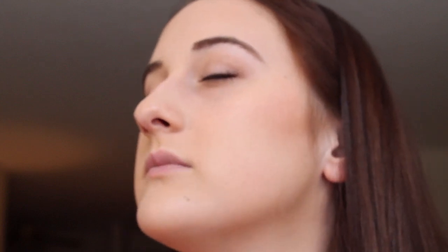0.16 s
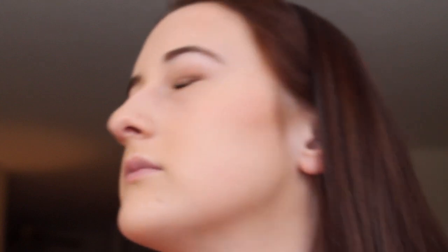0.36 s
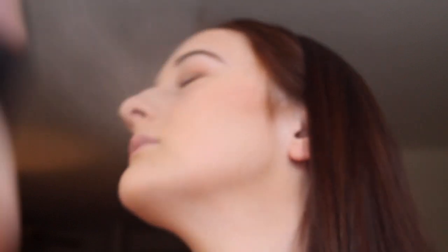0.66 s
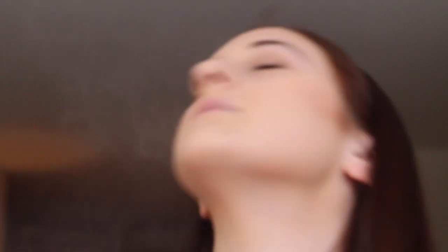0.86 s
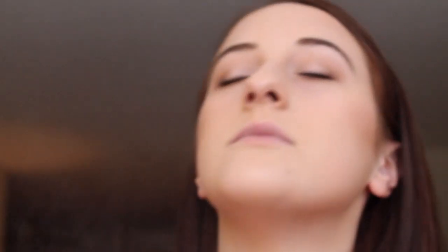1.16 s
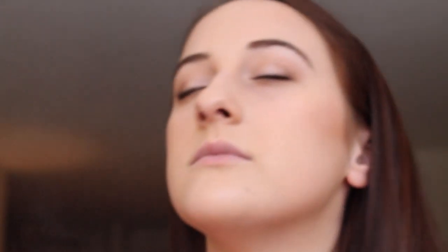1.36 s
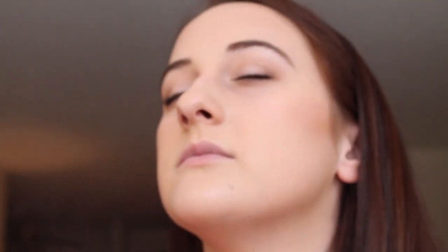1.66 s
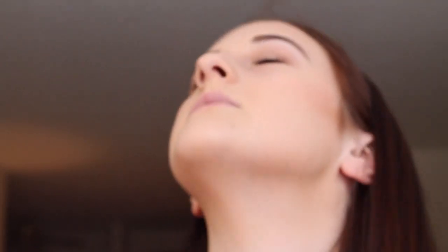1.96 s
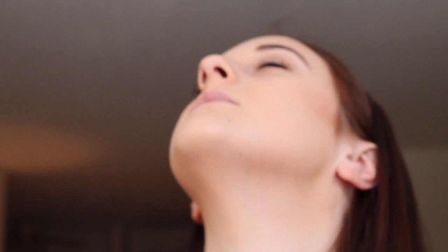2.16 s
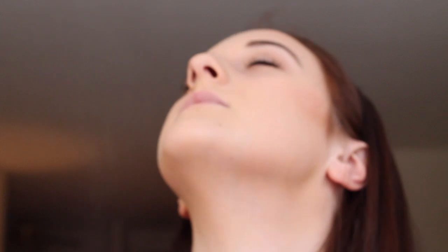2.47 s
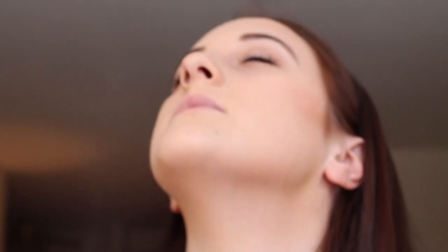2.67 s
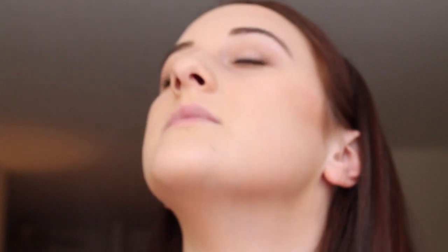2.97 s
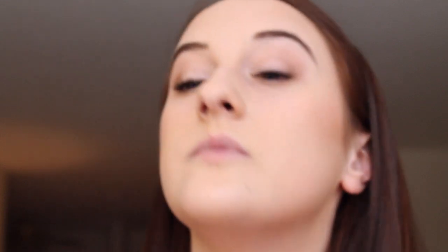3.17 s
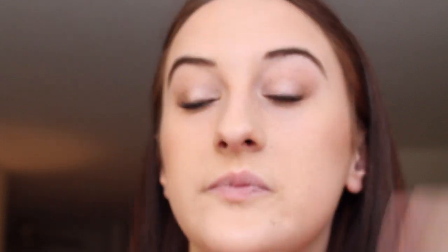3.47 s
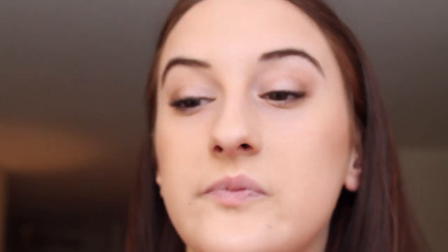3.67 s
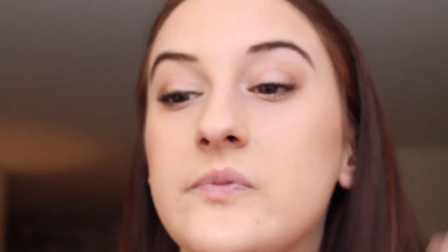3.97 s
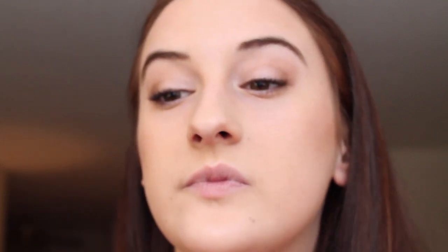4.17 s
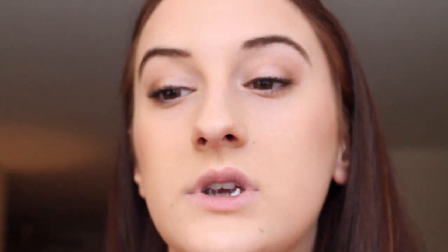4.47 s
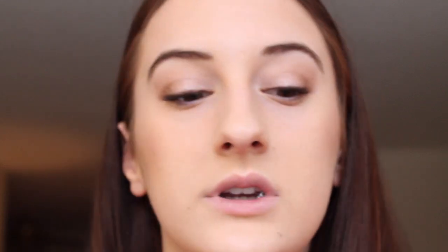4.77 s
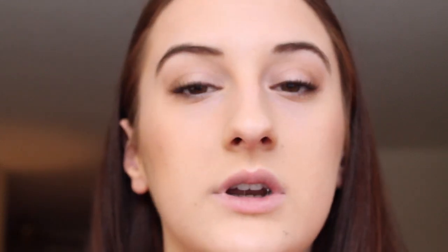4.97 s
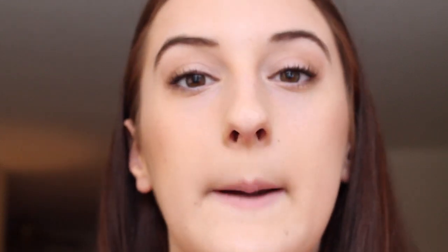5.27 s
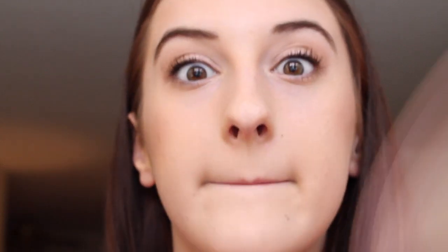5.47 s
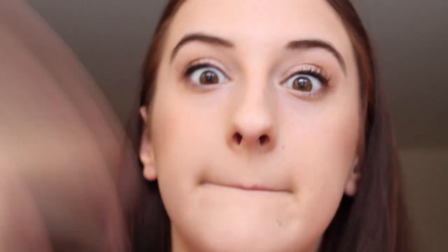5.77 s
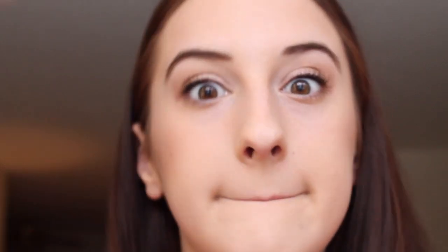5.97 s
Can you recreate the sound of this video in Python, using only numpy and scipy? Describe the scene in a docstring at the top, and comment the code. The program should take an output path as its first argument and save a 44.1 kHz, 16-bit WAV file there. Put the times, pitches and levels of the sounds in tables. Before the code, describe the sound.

In a quiet little room with faint ventilation, one close microphone picks up four fast puffs of mist from a spray bottle and a fifth after a short pause. The pump ticks and gulps after each stroke, and fingers tap the plastic. The cap clicks sharply into place. A lull follows, then soft wet lip smacks, and finally a solid knock as the bottle lands on a table.

```python
"""A small, quiet room with a faint fan hum; one microphone, close to a pump spray bottle.
Five quick spritzes hiss as the jet tears into droplets. Fingers tap the plastic, bubbles glug,
and after each stroke the plunger ticks back up and liquid gulps into the pump.
The cap snaps on, lips part with small wet smacks, and the bottle knocks down on a table."""
import sys
import numpy as np
from scipy import signal
from scipy.fft import rfft, irfft
from scipy.io import wavfile

SR = 44100
rng = np.random.default_rng(int(sys.argv[2]) if len(sys.argv) > 2 else 0)


def log_audio(samples):
    """Write samples as a 16-bit WAV file to the path given in sys.argv[1]."""
    # one column per channel
    frames = np.atleast_2d(samples).T
    # limit to full scale, then quantise
    limited = np.clip(frames, -1, 1)
    pcm = np.round(limited * 32767).astype(np.int16)
    wavfile.write(sys.argv[1], SR, pcm)


N = 269719

# room tone, the spectrum of the ventilation: f/Hz, level/dB
VENT_SPECTRUM = [(15, -56), (25, -29.5), (64, -10), (129, -6.5), (152, -5.5), (313, -5.5), (349, -6),
                 (509, -6), (631, -13), (703, -8.5), (997, -14), (1080, -12.5), (1240, -14.5), (1900, -18),
                 (15500, -34.5)]
# fan tones: f/Hz, level/dB
FAN_TONES = [(212, -74.5), (318, -71.5), (404, -84.5), (1061, -74)]
# fingers and cap tapping the plastic: t/s, level/dB, f/Hz
PLASTIC_TAPS = [(.3337, -29, 2170), (.6072, -43.5, 3500), (0.621, -52, 4800), (.8786, -40, 4700),
                (1.0425, -50, 4320), (1.6572, -52.5, 4400), (2.6755, -55, 3750), (2.7428, -47, 2230),
                (2.8222, -57, 3900), (2.9312, -35, 1830)]
# microphone colour on the ticks, with a dip near 10.5 kHz and a lift near 13.5 kHz: f/Hz, level/dB
MIC_SPECTRUM = [(500, 6), (3000, 2.5), (6000, 3.5), (8200, 0), (10500, -9), (13500, 3), (16000, 2)]
# pump strokes: start t/s, swell/s, end t/s, fade/s, level/dB, tilt/(dB per octave)
STROKES = [(.372, 0.025, 0.55, 0.077, -42.5, 2.5), (.636, 0.021, 0.8, 0.072, -39.5, 3.5),
           (.908, 0.028, 1.08, 0.095, -42.5, 4.5), (1.195, 0.045, 1.3455, .066, -43.5, 3.5),
           (1.795, 0.067, 1.942, 0.0032, -41.5, 2.5)]
# hiss of the mist, close up: f/Hz, level/dB
MIST_SPECTRUM = [(350, -58), (600, -29), (706, -4), (940, -7.5), (1320, -1.5), (1600, -5), (2160, 0),
                 (2340, -1), (3160, 1), (4880, 0), (5290, -2), (7960, -5), (10700, -15.5), (13900, -15),
                 (15500, -22.5)]
# air bubbles in the liquid: t/s, level/dB, f/Hz, t60/s
AIR_BUBBLES = [(.3742, -35.5, 794, 0.038), (.398, -43.5, 816, 0.081), (.416, -33.5, 854, 0.0085),
               (0.6747, -41.5, 840, 0.011), (.6955, -37.5, 1270, 0.015), (1.8461, -40.5, 1000, 0.012),
               (2.353, -48.5, 1465, 0.074), (2.6953, -45.5, 950, 0.056)]
# plunger return: t/s, tick level/dB, f/Hz, treble slope/(dB per octave), gulp lag/s, gulp level/dB
PLUNGER_RETURNS = [(0.5348, -31, 2920, -6.5, 0.024, -37.5), (0.7959, -35.5, 4500, 3, 0.019, -25),
                   (1.0612, -35, 2850, -4, .0187, -31), (1.352, -31.5, 2790, -8, .0213, -30.5),
                   (2.035, -36, 3000, -4, 0.032, -27)]
# contacts as the cap seats: t/s, level/dB
CAP_HITS = [(2.9333, 2.5), (2.9403, -17)]
# colour of the cap's snap: f/Hz, level/dB
SNAP_SPECTRUM = [(240, -65.5), (400, -41), (552, -52), (772, -11.5), (1020, -11), (1540, -14), (1740, -7),
                 (2630, -5), (3010, -3.5), (3790, -2.5), (6580, -5.5), (7910, -10), (10600, -22.5),
                 (15500, -23)]
# modes of the capped bottle: f/Hz, level/dB, t60/s
BOTTLE_MODES = [(1906, -4, .3), (2169, -4, .3), (3090, -3, .1), (3892, 0, .3), (4140, 0, .2), (4665, 0, .3),
                (5006, -3, .25)]
# lip smacks and the mouth's ring: t/s, level/dB, f/Hz
LIP_SMACKS = [(4.3886, -30.5, 6270), (4.3945, -46, 5770), (4.4157, -51, 4060), (4.5581, -38.5, 1700),
              (4.5612, -45.5, 4000), (4.7572, -42.5, 1450), (4.7703, -42, 1564), (4.783, -43.5, 1610)]
# contacts of the bottle's base with the table: t/s, level/dB
BASE_HITS = [(5.1195, 5.5), (5.1286, -6.5), (5.32, -30)]
# colour of the knock: f/Hz, level/dB
KNOCK_SPECTRUM = [(59, -62), (100, -21.5), (198, -23), (376, -2.5), (895, -3.5), (993, -0.5), (1100, -17),
                  (1220, -5.5), (1330, -12.5), (1730, -8.5), (2470, -18), (3290, -27.5), (4680, -28.5),
                  (6120, -41), (14000, -68)]
# modes of the table: f/Hz, level/dB, t60/s
TABLE_MODES = [(398, 1, .33), (573, -6, .28), (619, -5, .3), (727, -1, .19), (797, -11, .3), (990, -6, .25),
               (1147, -4, .25), (1226, -4, .2), (1580, -11, .3), (1770, -5, .12), (2073, -12, .25)]
# decay of the room: f/Hz, t60/s
ROOM_DECAY = [(250, 0.75), (700, 0.34), (2000, 0.42), (4500, 0.46), (8000, 0.34), (15000, 0.11)]
# reflections off near surfaces, timed from the direct sound: t/s, level/dB
REFLECTIONS = [(.0026, -18), (.0046, -15.5), (.0072, -27), (.0098, -13.5), (0.0419, -18)]


def amp(db):
    """Decibels to gain."""
    return 10 ** (np.asarray(db) / 20)


def unit(x):
    """Scales to rms 1."""
    return x / np.sqrt(np.mean(x ** 2) + 1e-20)


def curve_at(points, hz):
    """Joins points by straight lines over log frequency."""
    f, value = np.transpose(points)
    return np.interp(np.log(hz + 1), np.log(f + 1), value)


def seconds(length):
    """A time axis."""
    return np.arange(int(length * SR)) / SR


def add(mix, start, sound):
    """Mixes a sound in at a time in seconds."""
    part = mix[max(round(start * SR), 0):][:len(sound)]
    part += sound[:len(part)]


def colour(x, spectrum, tilt_db=0, size=4096):
    """Minimum-phase filter of unit energy with the given spectrum, tilted per octave."""
    hz = np.fft.rfftfreq(size, 1 / SR)
    log_gain = np.log(amp(curve_at(spectrum, hz) + tilt_db * np.log2(hz + 20)))
    mirrored = np.r_[log_gain, log_gain[-2:0:-1]]
    response = np.fft.ifft(np.exp(np.conj(signal.hilbert(mirrored)))).real
    return signal.fftconvolve(x, response / np.linalg.norm(response))[:len(x)]


def low_cut(x, hz):
    """Small things radiate almost no bass."""
    return signal.sosfilt(signal.butter(3, hz, "highpass", fs=SR, output="sos"), x)


def drift(rate_hz):
    """Random wandering of rms 1, mostly slower than the rate."""
    hz = np.fft.rfftfreq(N, 1 / SR)
    return unit(irfft(rfft(rng.standard_normal(N)) / (1 + (hz / rate_hz) ** 4), N))


def ring(t, hz, t60):
    """One dying mode."""
    return np.sin(2 * np.pi * hz * t) * amp(-60 * t / t60)


def burst(t60, passes=4):
    """A dense dying rattle of unit energy with no colour of its own."""
    t = seconds(.2)
    x = rng.standard_normal(len(t)) * amp(-60 * t / t60)
    for _ in range(passes):
        spectrum = rfft(x)
        whitened = irfft(spectrum / (abs(spectrum) + 1e-12), len(t))
        x = whitened * np.exp(-(t / t60) ** 2)
    return x / np.linalg.norm(x)


def room_tone(vent_db=-60, waver_rad=0.82):
    """Soft ventilation noise with a few wavering fan tones, behind everything."""
    air = unit(colour(rng.standard_normal(N), VENT_SPECTRUM))
    t = np.arange(N) / SR
    hum = sum(amp(db) * unit(np.sin(2 * np.pi * hz * t + waver_rad * drift(2.4))) for hz, db in FAN_TONES)
    return amp(vent_db) * air + hum


def clicks(rows, rattle_db, crack_db):
    """Each click is a broad crack with a brief rattle, round one short ring."""
    out, t = np.zeros(N), seconds(.2)
    for start, db, hz, t60, slope_db in rows:
        shape = [(hz / 6, -32), (hz / 2, -13), (hz, 0), (hz * 2, slope_db - 3),
                 (hz * 16, 4 * slope_db - 3)]
        crack = colour((t == 0) + amp(rattle_db) * burst(t60), shape)
        add(out, start, amp(db) * (ring(t, hz, t60) + amp(crack_db) * crack))
    return out


def glugs(rows, gulp_db=9, slosh_db=-2, slosh_t60=0.047, slosh_lag_s=0.00187):
    """Liquid is jolted in the pump; a pocket of air rings briefly and the liquid sloshes after."""
    out, t = np.zeros(N), seconds(.2)
    for start, db, hz, t60 in rows:
        shape = [(hz * .5, -28), (hz * 0.69, 0), (hz * 1.41, -3), (hz * 2, -22), (hz * 12, -48)]
        flow = 1. * (t == 0)
        add(flow, slosh_lag_s, amp(slosh_db) * burst(slosh_t60))
        add(out, start, amp(db) * (amp(gulp_db) * colour(flow, shape) + ring(t, hz, t60)))
    return low_cut(out, hz=450)


def taps(t60=0.0092, slope_db=-16, hollow_db=-3.5, hollow_hz=880, hollow_t60=0.014):
    """Handling noise: each tap clicks on the plastic and jolts a hollow note from the liquid."""
    ticks = [(start, db, hz, t60, slope_db) for start, db, hz in PLASTIC_TAPS]
    jolts = [(start, db + hollow_db, hollow_hz, hollow_t60) for start, db, _ in PLASTIC_TAPS]
    return colour(clicks(ticks, rattle_db=8.5, crack_db=7.5), MIC_SPECTRUM) + glugs(jolts)


def spray(sputter_db=0.74, sputter_hz=350, opening=0.52, brighten_db=0.5):
    """The jet tears into droplets: a sputtering hiss that swells and fades with the finger's pressure."""
    jet = unit(rng.standard_normal(N) * amp(sputter_db * drift(sputter_hz)))
    out = np.zeros(N)
    for start, swell, end, fade, db, tilt_db in STROKES:
        t = seconds(end - start)
        # the valve opens abruptly once the pressure passes its threshold
        push = opening + (1 - opening) * np.sin(np.pi / 2 * np.clip(t / swell, 0, 1))
        pressure = push * np.clip((t[-1] - t) / fade, 0, 1)
        # the mist brightens a little along the stroke
        hiss = jet[round(start * SR):][:len(t)]
        dull = colour(hiss, MIST_SPECTRUM, tilt_db - brighten_db)
        bright = colour(hiss, MIST_SPECTRUM, tilt_db + brighten_db)
        travel = t / t[-1]
        add(out, start, amp(db) * pressure ** 2.23 * ((1 - travel) * dull + travel * bright))
    return out


def bubbles(jet_lag_s=.048, spit_db=7, spit_hz=4500, spit_t60=0.0029, slope_db=-4):
    """Bubbles glug in the bottle; one that meets the running jet spits at the nozzle."""
    spits = [(at, db + spit_db, spit_hz, spit_t60, slope_db) for at, db, _, _ in AIR_BUBBLES
             if any(start + jet_lag_s < at < end for start, _, end, *_ in STROKES)]
    return colour(clicks(spits, rattle_db=10, crack_db=4), MIC_SPECTRUM) + glugs(AIR_BUBBLES)


def plunger(tick_t60=0.0077, refill_hz=885, refill_t60=0.016):
    """The plunger ticks against its stop; a moment later liquid gulps into the chamber."""
    ticks = [(start, db, hz, tick_t60, slope_db) for start, db, hz, slope_db, _, _ in PLUNGER_RETURNS]
    gulps = [(start + lag, db, refill_hz, refill_t60) for start, *_, lag, db in PLUNGER_RETURNS]
    return colour(clicks(ticks, rattle_db=7.5, crack_db=5), MIC_SPECTRUM) + glugs(gulps)


def impact(contacts, spectrum, modes, contact_t60, shell_db, shell_t60, modes_db):
    """Hard contacts in quick succession; the first sets off the shell's shudder and longer modes."""
    force, tones, t = np.zeros(N), np.zeros(N), seconds(.5)
    for start, db in contacts:
        add(force, start, amp(db) * burst(contact_t60))
    first = contacts[0][0]
    add(force, first, amp(shell_db) * burst(shell_t60))
    for hz, db, t60 in modes:
        add(tones, first, amp(db) * ring(t, hz, t60) * rng.choice([-1, 1]))
    return colour(force, spectrum) + amp(modes_db) * tones


def cap_snap():
    """The cap seats with a sharp double click and the bottle rings faintly."""
    return impact(CAP_HITS, SNAP_SPECTRUM, BOTTLE_MODES,
                  contact_t60=0.0027, shell_db=-2, shell_t60=0.038, modes_db=-46)


def lips(t60_at_1khz=0.065, damping_power=1.2, slope_db=-12.5):
    """Wet films snap as the lips part; the wider the mouth, the lower and longer it rings."""
    smacks = [(start, db, hz, t60_at_1khz * (1000 / hz) ** damping_power, slope_db)
              for start, db, hz in LIP_SMACKS]
    return clicks(smacks, rattle_db=4, crack_db=6.5)


def set_down():
    """The bottle's base knocks on the table and settles; the table rings under it."""
    return impact(BASE_HITS, KNOCK_SPECTRUM, TABLE_MODES,
                  contact_t60=0.013, shell_db=6.5, shell_t60=0.052, modes_db=-35.5)


def room(x, tail_db):
    """At the microphone: direct sound, near reflections and a diffuse tail whose top dies first."""
    length = int(.7 * SR)
    hz, t, noise = signal.stft(rng.standard_normal(length), SR, nperseg=256)
    decay = amp(-60 * t / curve_at(ROOM_DECAY, hz)[:, None])
    tail = signal.istft(noise * decay, SR, nperseg=256)[1][:length]
    response = amp(tail_db) * tail / np.linalg.norm(tail)
    for delay, db in REFLECTIONS:
        add(response, delay, amp([db]))
    return x + signal.fftconvolve(x, response)[:N]


def scene():
    """Bottle and lips at close range, in mono, over the room tone."""
    pump = plunger() + taps() + bubbles()
    cap, knock = cap_snap(), set_down()
    at_mic = (room(spray(), tail_db=-13.5) + room(pump, tail_db=-11) + room(lips(), tail_db=-14.5)
              + room(cap, tail_db=-11.5) + room(knock, tail_db=-9))
    return (low_cut(at_mic, hz=127) + room_tone())[None]


def record(dry):
    """The recorder's band ends at 16 kHz."""
    low_pass = signal.firwin(511, 16000, window=("kaiser", 9), fs=SR)
    return signal.oaconvolve(dry, low_pass[None], "same")


dry = scene()
out = record(dry)
log_audio(out)
```